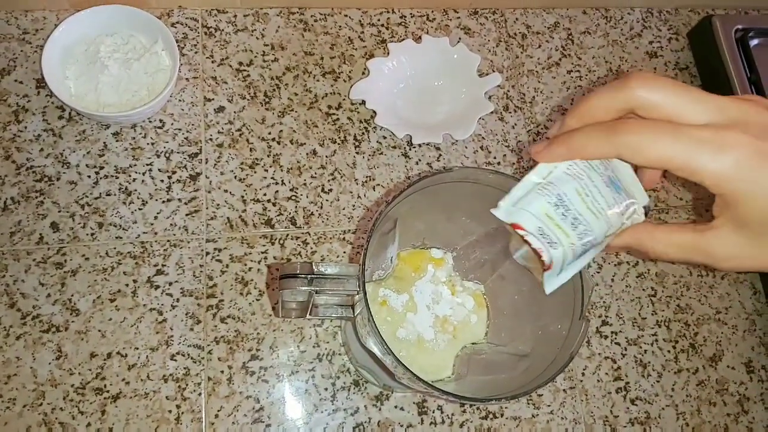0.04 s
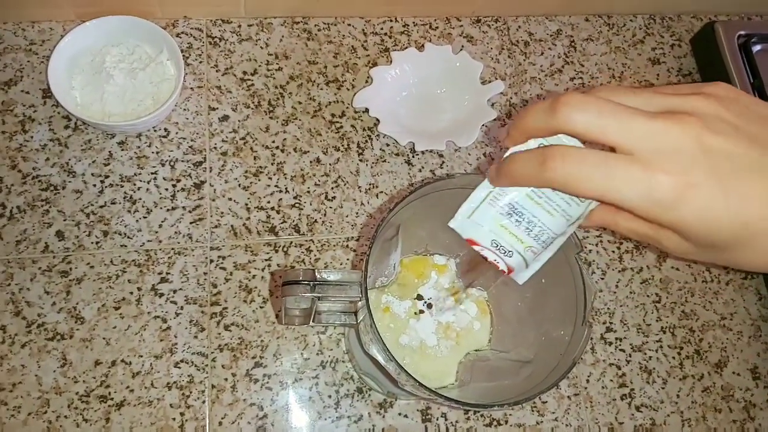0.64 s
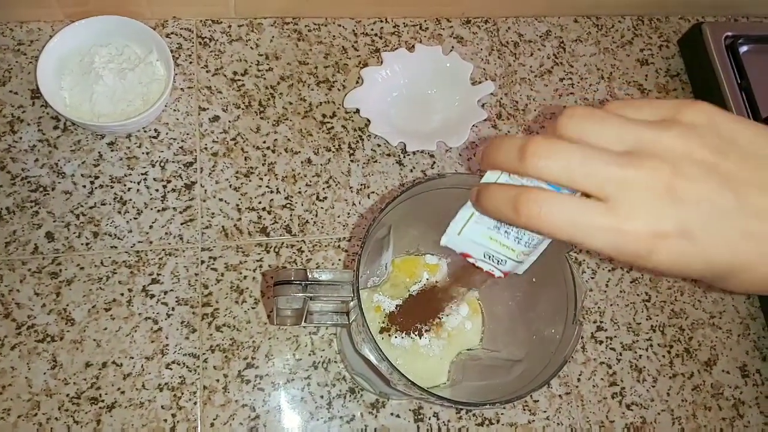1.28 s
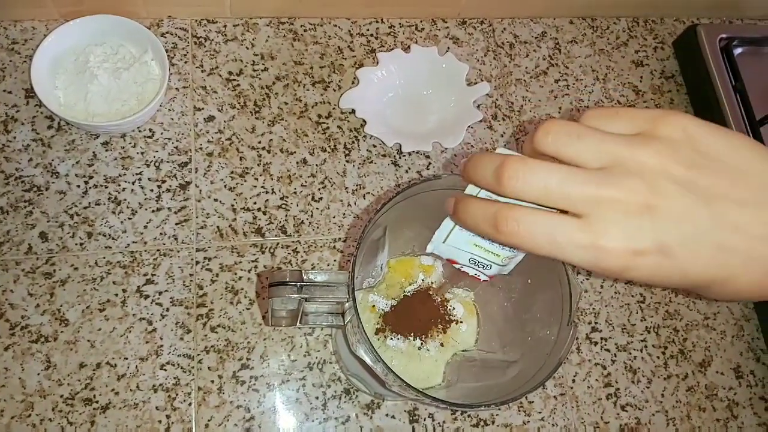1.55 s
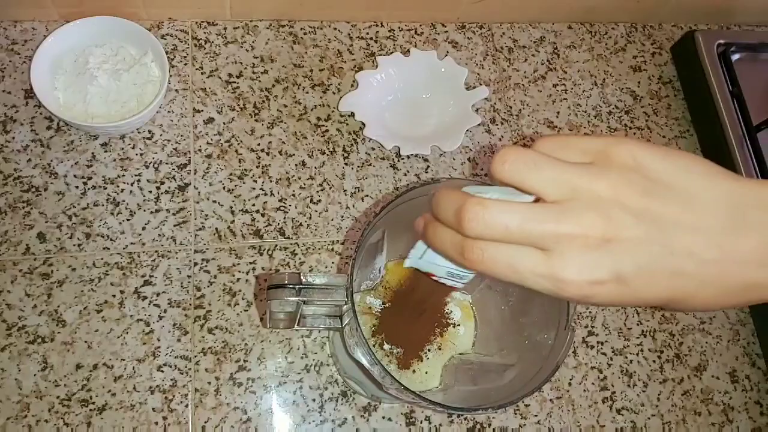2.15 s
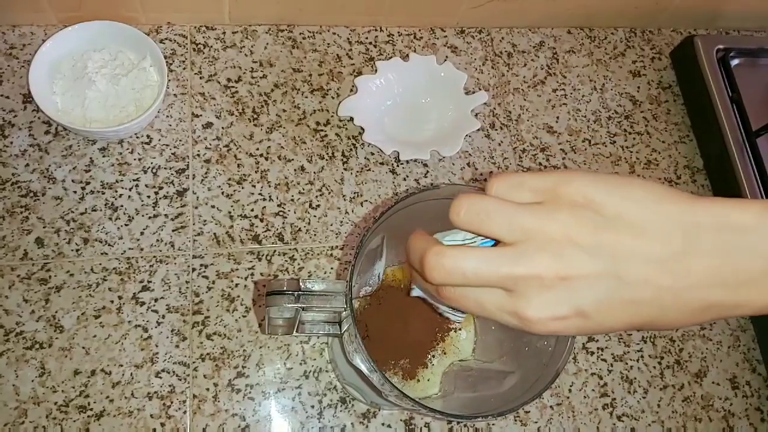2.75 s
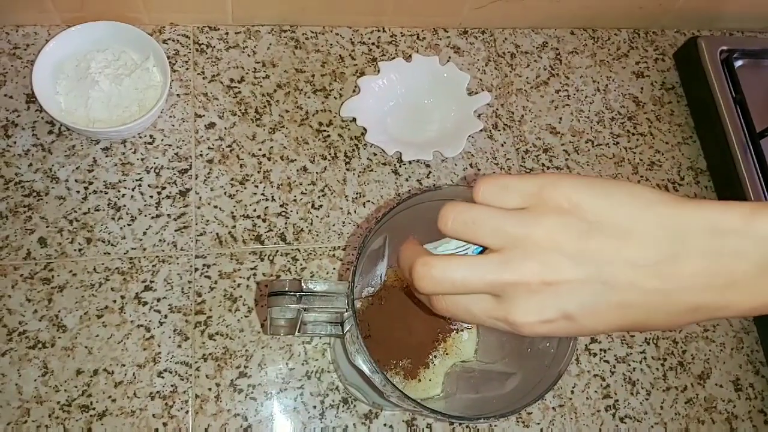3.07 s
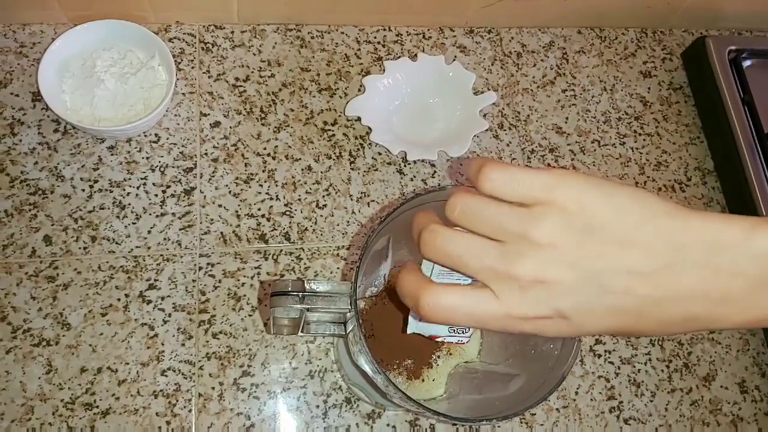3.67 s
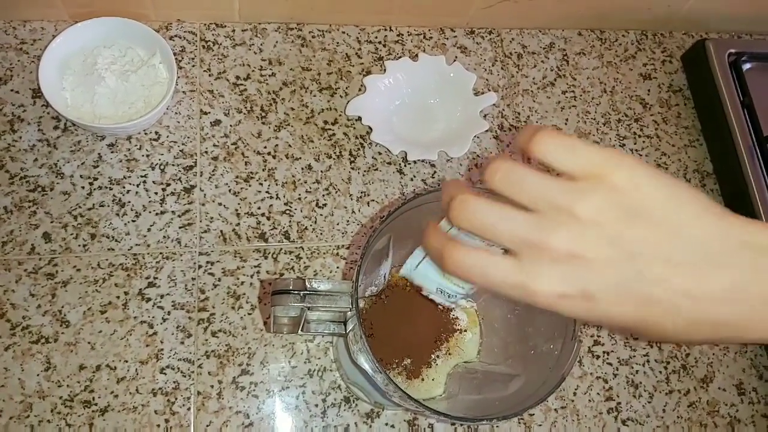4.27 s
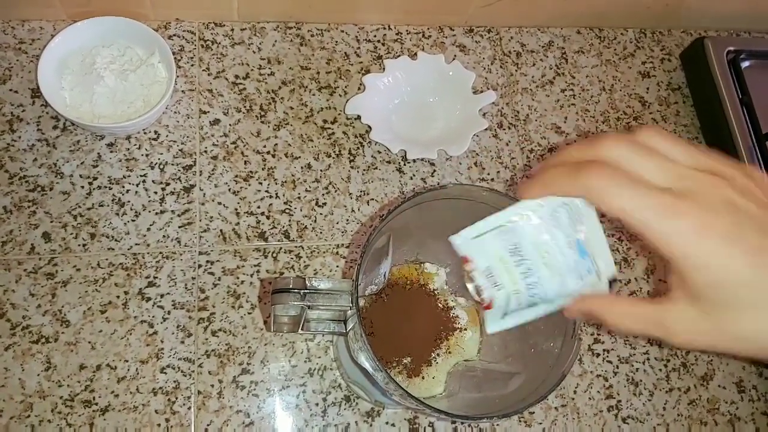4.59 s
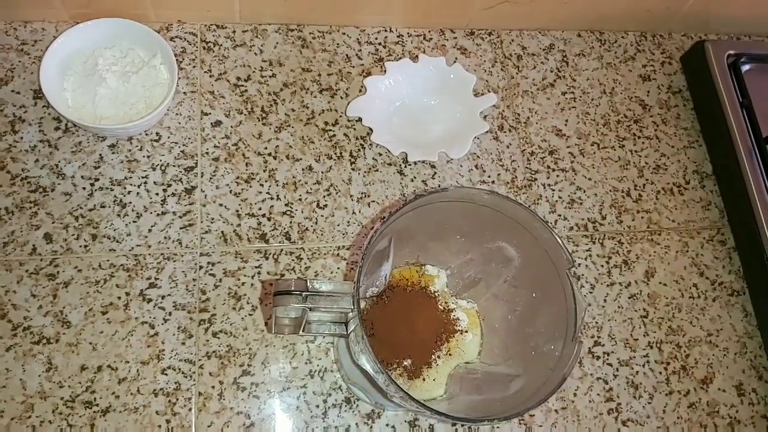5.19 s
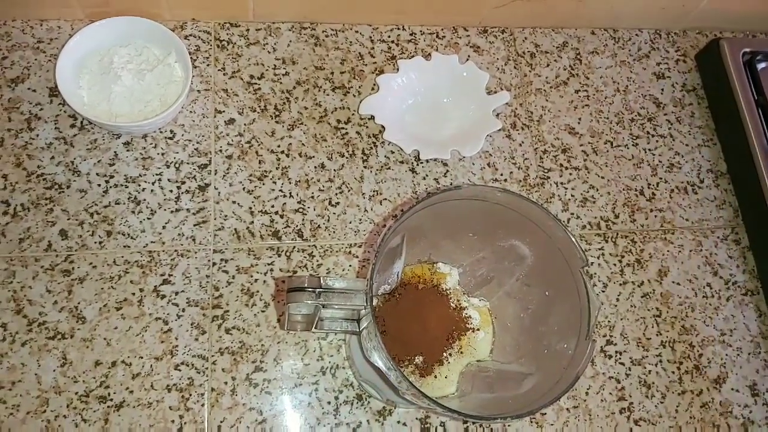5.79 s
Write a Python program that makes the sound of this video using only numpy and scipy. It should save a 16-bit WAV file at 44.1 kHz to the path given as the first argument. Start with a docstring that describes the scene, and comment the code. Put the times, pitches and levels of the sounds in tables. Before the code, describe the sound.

A paper sachet is squeezed and tapped over a plastic bowl, with light crackles and rustles over a refrigerator's hum.

```python
"""Paper sachet over a mixing bowl

A kitchen, the microphone close to a sachet of powder being tipped, squeezed and flicked over a plastic
bowl. Fingers rub the paper, and its stiff panels buckle in short snaps that wake the bowl and the walls.
In the background, to the right, a refrigerator hums throughout. The sound cuts out once for a moment."""
import sys
import numpy as np
from scipy import signal
from scipy.fft import rfft, irfft
from scipy.io import wavfile
from scipy.ndimage import uniform_filter1d

SR = 44100
rng = np.random.default_rng(int(sys.argv[2]) if len(sys.argv) > 2 else 0)


def pcm_store(signal):
    """Save signal as 16-bit PCM."""
    levels = np.round(np.clip(np.atleast_2d(signal), -1, 1) * 32767)
    wavfile.write(sys.argv[1], SR, levels.astype(np.int16).T)


N = 257448

# refrigerator tones, the mains hum first: pitch_hz, left_db, right_db, left_lead_rad, waver_db
FRIDGE_TONES = [ (100.0, -46, -45, .13, .4), (144.7, -60, -53, 0, 3), (168.1, -58, -51, -.15, 1),
                (200.1, -59, -52, .26, .8), (336.3, -52.5, -46.5, .41, .6), (1281, -78, -75, 0, 2),
                (1776, -69, -75, 0, 2), (3203, -88, -75, 0, 1), (3892, -86, -77, 0, 1),
                (4140, -80, -77, 0, 2.5), (5469, -90, -80, 0, 1), (5965, -85, -76, 0, 2),
                (6605, -90, -79, 0, 2), (7300, -86, -80, 0, 2), (12419, -91, -82, 0, 1),
                (12930, -92, -83, 0, 1)]
# slow rise of the mains hum: time_s, gain_db
MAINS_GAIN = [(0, -2.5), (1.5, -2), (3.2, 0.5), (5.8, 0)]
# course of the strongest whine: time_s, level_db
WHINE_COURSE = [(0, -65), (1.2, -65.5), (1.6, -67), (3.3, -64), (4.4, -68.5), (5.42, -66), (5.52, -56),
                (5.62, -65), (5.84, -66)]
# spectrum of the room tone, refrigerator rumble and hiss: frequency_hz, relative_db
ROOM_TONE_COLOUR = [(25, -43.5), (40, -19), (55, -10), (80, -15), (140, -5.5), (220, -19.5), (310, -8),
                    (420, -18), (800, -25), (2500, -29.5), (4100, -32.5), (5000, -42.5), (7200, -34.5),
                    (9500, -53.5), (16000, -52)]
# resonances in the room tone: centre_hz, width_hz, gain_db
ROOM_TONE_PEAKS = [(141, 296, 5), (1300, 140, 3.5), (2696, 46, 2), (4200, 90, 3), (11940, 490, 13),
                   (12840, 350, 14)]
# slow wander of the room tone: frequency_hz, swing_db
ROOM_TONE_SWING = [(50, 1), (250, 1.6), (2000, 1.6)]
# where the room tone sits: frequency_hz, left_minus_right_db
ROOM_TONE_BALANCE = [(60, -5.5), (92, 0.5), (140, -9.5), (210, -6), (330, -6.5), (500, -5.5), (770, -7.5),
                     (1170, -7.5), (1790, 6), (2740, -25), (4190, -1.5), (6410, -4.5), (9810, -13),
                     (15000, -8)]
# how alike the room sounds on the microphone's two sides: frequency_hz, correlation
ROOM_LIKENESS = [(60, 0.63), (120, 1), (240, 0.69), (480, 0.7), (950, -0.38), (1890, 0.029), (3770, -0.26),
                 (7520, -0.043), (15000, -0.05)]
# finger strokes on the paper: start_s, length_s, level_db, swell_s
FINGER_STROKES = [(0, 0.45, -61.5, 0.019), (0.706, 0.34, -59.5, 0.038), (1.653, 0.17, -68.5, 0.035),
                  (1.97, 0.42, -54, 0.11), (2.449, 0.014, -45.5, 0.0036), (2.5, 0.38, -56.5, .03),
                  (2.788, 0.35, -61, 0.042), (3.387, 0.17, -60, .03), (3.64, 0.019, -50, 0.011),
                  (3.76, 0.46, -53.5, 0.025), (4.097, 0.38, -62.5, .05), (4.92, 0.5, -56, 0.17),
                  (5.387, 0.48, -63, 0.066), (5.744, .02, -57, 0.0075)]
# spectrum of rubbed paper: frequency_hz, relative_db
PAPER_COLOUR = [(700, 11), (1400, 5), (2200, 13.5), (3200, 0.5), (4800, 6.5), (7000, -5), (10000, -6),
                (16000, -22.5)]
# snaps of the sachet: start_s, strength_db, slope_db_per_octave, crack_boost_db, fizz_boost_db,
# bowl_knock_db, lower_panel_hz, upper_panel_hz, left_minus_right_db
SACHET_SNAPS = [ (0.11, -51, -2, -1, 3, -59, 2020, 7300, 1),
                (0.3477, -46, -9, -3.5, 0, -69, 1350, 2080, -3),
                (0.5231, -57, -3, 4, 5, -56, 2040, 2260, 2),
                (0.7008, -42.5, 0.9, 4, -1, -55, 1350, 4400, 0),
                (0.8645, -47.5, -1, 3, -4, -48, 1300, 4370, 0),
                (0.8685, -37.5, 0, 5.5, 9, -42, 1330, 4160, -2),
                (0.877, -50, -1, 10.5, 0, -51, 2560, 3400, 7), (1.7475, -59, -7, 4, 0, -76, 2850, 4120, -8),
                (1.8803, -62, -4.5, 3, 7, -54, 1540, 2840, -2),
                (2.014, -47, -6, -11, 5, -49, 1460, 2300, -2),
                (2.025, -33, 2, -3.5, 1.5, -48, 1300, 4450, -2),
                (2.0275, -37.5, -12, 7, 0, -31, 736, 1540, -6),
                (2.2215, -47, -4.5, -18, 0.5, -43.5, 1300, 1690, 0.5),
                (2.4253, -54.5, -3, -2, -3, -55.5, 1430, 2380, 2),
                (2.5406, -26.5, -7.5, -5.5, 1, -34.5, 1350, 1540, -6),
                (2.561, -44, -13, -9, 0, -51, 1340, 1480, -1),
                (2.602, -44.5, -9, -2, 0, -62, 1380, 1520, 1),
                (2.645, -53.5, -3, 2.5, -5, -50, 1510, 6300, -4),
                (2.7533, -44, -1, -0.5, 3.5, -49, 3760, 7600, -1),
                (2.8357, -50, -4, 1, 1, -51, 2280, 7600, 1),
                (2.9936, -51, -1.5, 1.5, -3, -75, 2280, 4730, 2),
                (3.0414, -57, -3.5, -1, 5, -74, 2280, 7000, 0),
                (3.086, -51, -13, 7.5, 0, -41.5, 474, 1590, 0),
                (3.1648, -57.5, -0.5, -10, -4, -59, 1750, 4200, 3),
                (3.3905, -54.5, -3.5, -6, 1, -56, 1600, 4200, -6),
                (3.464, -51.5, -5, -0.5, 5, -45, 1600, 2560, -6),
                (3.7795, -48.5, -3, -1, -4, -34.5, 443, 2280, 2),
                (3.7836, -48, -3, -7, -4, -33.5, 557, 1660, -14),
                (3.79, -47, 0.5, 1, -3, -34, 706, 2040, 7),
                (3.805, -44.5, 5, 5.5, 2, -32.5, 3700, 5270, 4.5),
                (3.946, -53, -5, 3, 0, -43.5, 1640, 2260, 0), (3.954, -45, -6.5, 4, -4, -54, 840, 1700, 4),
                (3.966, -37, 2.5, -1.5, -4.5, -43.5, 830, 3770, 1),
                (4.119, -50.5, -3.5, 12, -3, -36, 415, 1620, 9),
                (4.1223, -36.5, -1.5, -2, -1, -32.5, 690, 1690, -1),
                (4.285, -62.5, -1, -4, -4, -61, 1600, 4200, 0),
                (4.6055, -52.5, -2.5, 9, 4, -63, 3500, 6440, 2),
                (4.8446, -71, 5.5, 11, 1.5, -60, 6750, 12000, -8),
                (5.6699, -63, -2, 7, -6, -73, 1700, 2960, 10), (5.705, -68, -2, 7, 0, -62, 2440, 3020, 2),
                (5.7472, -70, 7, 1, -6, -64, 4180, 4860, 4)]
FIZZ_TOP_HZ = 13900
# a snap's registers (knock, hollow, panel, crack, edge, tick, fizz):
# low_hz, high_hz, ring_t60_s, lift_db, left_minus_right_db, room_send_db
SNAP_REGISTERS = [(274, 770, 0.043, 0.5, -5.5, -2.5), (713, 1160, 0.012, -1.5, 1, -2.5),
                  (1214, 1800, 0.0034, 0.5, 2, -6), (1770, 3210, 0.016, 1, -10, -2.5),
                  (3360, 4650, 0.0056, -2.5, 3.5, -2), (4950, 8030, 0.016, -1.5, 0, -4),
                  (7840, FIZZ_TOP_HZ, 0.013, -3.5, -0.5, -4)]
# extra ring of each register when it holds a panel's pitch: lift_db
PANEL_RING_DB = [1.7, 11.6, 2.84, 3.3, 1.1, 3, 1.8]
# resonances and dips of sachet and bowl: centre_hz, width_hz, gain_db
SACHET_AND_BOWL = [(484, 80, 10), (632, 47, 5), (906, 48, 3.5), (2280, 150, 6.5), (2770, 240, 4.5),
                   (1300, 160, -4.5), (1886, 72, -11), (4440, 410, 2), (7200, 330, 2.5)]
# decay of the kitchen's reverberation: frequency_hz, t60_s
REVERB_T60 = [(400, 0.67), (1500, 0.53), (4000, 0.5), (8000, .5), (15000, 0.5)]
# where the reverberation sits: frequency_hz, left_minus_right_db
REVERB_BALANCE = [(400, -1), (900, -4.5), (1600, -2), (2300, -0.5), (3100, -15), (4300, -2), (7000, 0),
                  (9000, -17), (14000, -1.5)]


def from_db(db):
    """Decibels to gain."""
    return 10 ** (np.asarray(db) / 20)


def unit_rms(x):
    """Scale to unit rms."""
    return x / np.sqrt(np.mean(x ** 2) + 1e-20)


def at_hz(points, hz):
    """Read a table on a log-frequency axis."""
    frequencies, values = np.transpose(points)
    return np.interp(np.log(hz), np.log(frequencies), values)


def pan(db):
    """Left and right gains of constant power; positive is left."""
    return unit_rms(from_db([[db / 2], [-db / 2]]))


def drift(rate_hz, hop=40, settle=2000):
    """Slow random wander of unit rms."""
    pole = np.exp(-2 * np.pi * hop * rate_hz / SR)
    white = rng.standard_normal(N // hop + settle + 2)
    slow = signal.lfilter([1], [1, -2 * pole, pole * pole], white)[settle:]
    return np.interp(np.arange(N) / hop, np.arange(len(slow)), unit_rms(slow))


def band(x, low, high, order=2):
    """Butterworth band-pass."""
    sos = signal.butter(order, [low, min(high, .47 * SR)], "band", fs=SR, output="sos")
    return signal.sosfilt(sos, x)


def resonate(x, peaks):
    """Each resonance lifts or dips its own band."""
    for hz, width_hz, db in peaks:
        r = np.exp(-np.pi * width_hz / SR)
        ring = signal.lfilter([1, 0, -1], [1, -2 * r * np.cos(2 * np.pi * hz / SR), r * r], x)
        x = x + (from_db(db) - 1) * (1 - r * r) / 2 * ring
    return x


def diffuse_bands(size, balance):
    """Noise reaching the microphone from all round the room, in third octaves: (centre_hz, stereo)."""
    edges = 22 * 2 ** (np.arange(30) / 3)
    white = rng.standard_normal((2, 2, size))
    for k, (low, high) in enumerate(zip(edges, edges[1:])):
        mid, side = band(white[k % 2], low, high)
        hz = np.sqrt(low * high)
        alike = at_hz(ROOM_LIKENESS, hz)
        stereo = np.sqrt(1 + alike) * mid + np.sqrt(1 - alike) * side * [[1], [-1]]
        yield hz, pan(at_hz(balance, hz)) * stereo


def refrigerator(waver_hz=3, mains_hz=100, beat_hz=1.398, motor_db=-8.5, in_step_s=0.43):
    """Background hum of wavering tones; the motor runs just under the mains hum and beats with it."""
    t = np.arange(N) / SR
    tones = []
    for hz, left_db, right_db, lead_rad, waver_db in FRIDGE_TONES:
        waver_rad = 0.06 * (hz / mains_hz) ** 0.67
        phase = 2 * np.pi * (hz * t + rng.random()) + waver_rad * drift(waver_hz)
        level = from_db(np.array([[left_db], [right_db]]) + waver_db * drift(waver_hz))
        tones.append(np.sqrt(2) * level * np.exp(1j * (phase + [[lead_rad], [0]])))
    beat = 1 + from_db(motor_db) * np.exp(-2j * np.pi * beat_hz * (t - in_step_s))
    mains = tones[0] * beat * from_db(np.interp(t, *np.transpose(MAINS_GAIN)))
    return np.imag(mains + sum(tones[1:]))


def whine(pitch_hz=2659, waver_hz=7, waver_db=1.0, waver_rad=0.55):
    """A thin whine comes and goes to the right of the microphone."""
    t = np.arange(N) / SR
    level = from_db(np.interp(t, *np.transpose(WHINE_COURSE)) - waver_db * drift(waver_hz))
    return pan(-15) * level * np.sin(2 * np.pi * pitch_hz * t + waver_rad * drift(waver_hz))


def room_tone(level_db=-46):
    """The refrigerator's rumble and the room's faint hiss, each band slowly rising and falling."""
    noise = 0
    for hz, stereo in diffuse_bands(N, ROOM_TONE_BALANCE):
        swing_db = at_hz(ROOM_TONE_SWING, hz) * drift(rate_hz=0.67)
        noise += stereo * from_db(at_hz(ROOM_TONE_COLOUR, hz) + swing_db)
    return from_db(level_db) * unit_rms(resonate(noise, ROOM_TONE_PEAKS))


def finger_pressure(release_s=0.072):
    """Each stroke swells, holds and dies away."""
    t = np.arange(N) / SR
    strokes = []
    for start_s, length_s, level_db, swell_s in FINGER_STROKES:
        swell = np.clip((t - start_s) / swell_s, 0, 1)
        release = np.exp(-np.maximum(t - start_s - length_s, 0) / release_s)
        strokes.append(from_db(level_db) * swell * release)
    return np.max(strokes, axis=0)


def rubbing(grains_per_s=1800, grain_db=3, clump_db=3, hiss_gain=4.3):
    """Close up, a little right: paper fibres catch and slip under the fingers, tiny grains in a hiss."""
    caught = rng.random(N) < grains_per_s * from_db(clump_db * drift(15)) / SR
    signs = rng.choice([-1, 1], N)
    sizes = from_db(grain_db * np.minimum(rng.exponential(1, N), 4))
    slips = unit_rms(caught * signs * sizes) + hiss_gain * rng.standard_normal((2, N))
    edges = 700 * 2 ** (np.arange(10) / 2)
    paper = 0
    for k, (low, high) in enumerate(zip(edges, edges[1:])):
        gain = from_db(at_hz(PAPER_COLOUR, np.sqrt(low * high)))
        paper += (-1) ** k * band(slips, low, high) * gain
    return unit_rms(paper) * pan(-5) * finger_pressure()


def fibre_slips(envelope, evenness=0.71, grit_db=1.5, fibre_s=.0004):
    """Mid and side of a run of slips with no deep spectral gaps; some fibres let go harder."""
    size = len(envelope)
    half_shape = np.sqrt(envelope)   # applied before and after evening the spectrum
    spectrum = rfft(rng.standard_normal((2, size)) * half_shape)
    slips = irfft(spectrum / (np.abs(spectrum) + 1e-9) ** evenness, size)
    fibre = (np.arange(size) / (fibre_s * SR)).astype(int)
    grit = from_db(-grit_db * np.clip(rng.standard_normal(size), -2, 2))[fibre]
    return slips * half_shape * grit


def register_levels(strength_db, slope_db, crack_db, fizz_db, knock_db, panels_hz, bowl_share=0.4):
    """The paper's five registers lie on a slope; knock and crack both drive the hollow of the pouch."""
    low, high, _, lift_db = np.transpose(SNAP_REGISTERS)[:4]
    centres = np.sqrt(low * high)
    panel, crack, edge, tick, fizz = strength_db + slope_db * np.log2(centres[2:] / centres[2])
    hollow = bowl_share * knock_db + (1 - bowl_share) * crack - 11
    levels_db = np.array([knock_db, hollow, panel, crack + crack_db, edge, tick, fizz + fizz_db])
    nearest = [np.argmin(np.maximum(low / hz, hz / high)) for hz in panels_hz]
    ringing = np.isin(np.arange(len(low)), nearest)
    return levels_db + lift_db + np.array(PANEL_RING_DB) * ringing


def snap(buckle_s, levels_db, panels_hz, side_db, span_s=0.0081, lead_s=.002):
    """A crease gives way in a quick run of tiny slips; returns the close sound and the room feed."""
    t = np.maximum(np.arange(4096) / SR - lead_s, 0)
    run = np.minimum(t / (0.2 * buckle_s), 1) * np.exp(-(t / buckle_s) ** 4)
    # the walls hear the snap from all sides at once, so its fine colour averages to one clean kick
    kick = signal.unit_impulse(len(t), int(np.argmax(run)))
    close_panels = [(hz, 0.073 * hz, 11) for hz in panels_hz]   # centre_hz, width_hz, gain_db
    room_panels = [(hz, 0.22 * hz, 6) for hz in panels_hz]
    close, room_feed = 0, 0
    for (low, high, t60_s, _, lean_db, send_db), db in zip(SNAP_REGISTERS, levels_db):
        # the paper rings on after the slips, longest in the lowest register
        energy_decay = from_db(-120 / (t60_s * SR))
        envelope = np.sqrt(signal.lfilter([1], [1, -energy_decay], run ** 2))
        mid, side = fibre_slips(envelope)
        side = side * 0.93 * np.sqrt(low / SNAP_REGISTERS[-1][0])   # wider towards the treble
        paths = np.array([mid + side, mid - side, kick]) + 1e-18   # left, right, room
        paths = resonate(band(paths, low, high, order=3), SACHET_AND_BOWL)
        paths = np.array([*resonate(paths[:2], close_panels), resonate(paths[2], room_panels)])
        energy = np.sum(paths ** 2, axis=1, keepdims=True)
        paths *= from_db(db) * np.sqrt(span_s * SR / energy)
        close += paths[:2] * pan(lean_db + side_db * (high > 2000))
        room_feed = paths[2] * from_db(send_db) - room_feed   # neighbouring registers alternate in sign
    return close, room_feed


def sachet(buckle_s=0.0027, buckle_at_db=-35, halving_db=20.5, lead_s=.0025, send_db=-1.5):
    """The panels snap close to the microphone; the harder the snap, the faster it buckles."""
    close, room_feed = np.zeros((2, N + SR)), np.zeros(N + SR)
    for start_s, strength_db, *colour, lower_hz, upper_hz, side_db in SACHET_SNAPS:
        panels_hz = lower_hz, upper_hz
        run_s = buckle_s * 2 ** ((buckle_at_db - strength_db) / halving_db)
        levels_db = register_levels(strength_db, *colour, panels_hz)
        direct, feed = snap(run_s, levels_db, panels_hz, side_db)
        at = round((start_s - lead_s) * SR)
        close[:, at:at + len(feed)] += direct
        room_feed[at:at + len(feed)] += feed
    return close[:, :N], room_feed[:N] * from_db(send_db)


def kitchen_reverb(feed, build_s=0.0014, early_db=3, early_s=0.01):
    """The worktop and bowl answer first, then the hard walls give a tail that dies band by band."""
    t = np.arange(SR * 3 // 4) / SR
    tail = sum(noise * from_db(-60 * t / at_hz(REVERB_T60, hz))
               for hz, noise in diffuse_bands(len(t), REVERB_BALANCE))
    build = 1 - np.exp(-(t / build_s) ** 2)
    early_lift = from_db(early_db * np.exp(-t / early_s))
    response = unit_rms(tail * build * early_lift) / np.sqrt(len(t))
    return signal.fftconvolve(feed[None], response, axes=1)[:, :N]


def scene():
    """The sachet close to the microphone, the kitchen around it."""
    snaps, room_feed = sachet()
    return snaps + kitchen_reverb(room_feed) + rubbing() + refrigerator() + whine() + room_tone()


def record(dry, dropout_start_s=2.247, dropout_end_s=2.385, cutoff_hz=16300):
    """The sound drops out briefly, and the highest treble is cut."""
    t = np.arange(N) / SR
    live = (t < dropout_start_s) | (t > dropout_end_s)
    gate = uniform_filter1d(1.0 * live, size=64)
    low_pass = signal.ellip(10, .1, 80, cutoff_hz, fs=SR, output="sos")
    return signal.sosfilt(low_pass, dry * gate + 1e-18)


dry = scene()
out = record(dry)
pcm_store(out)
```